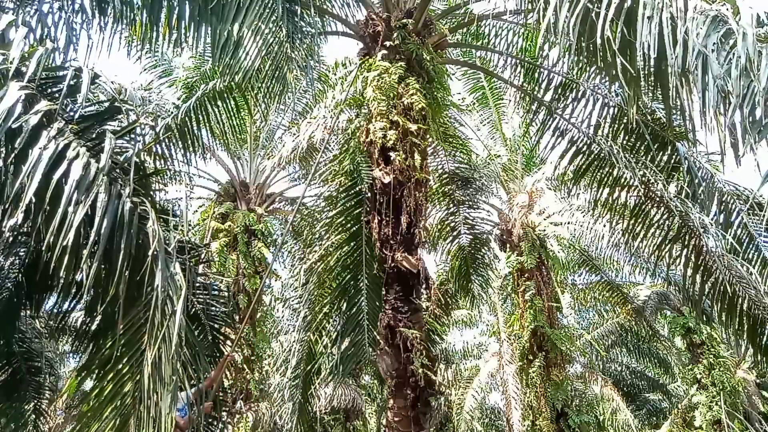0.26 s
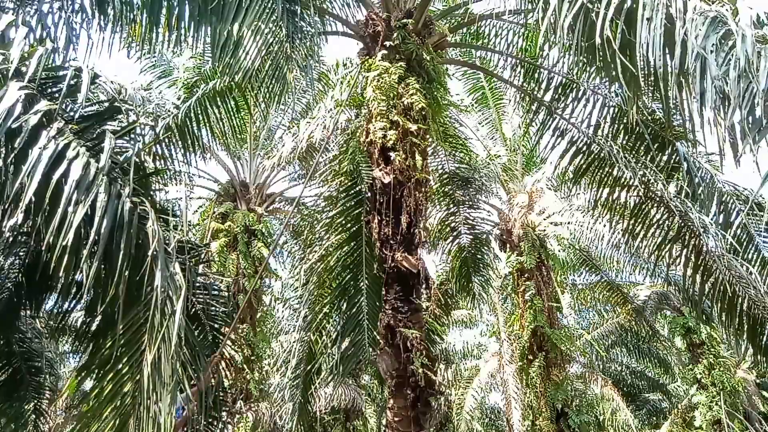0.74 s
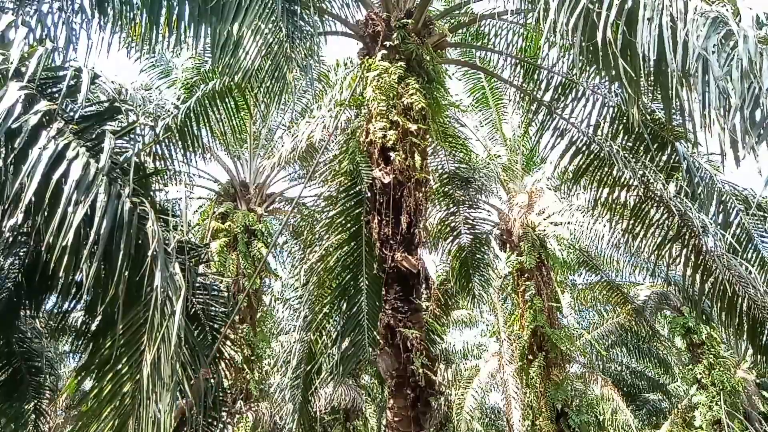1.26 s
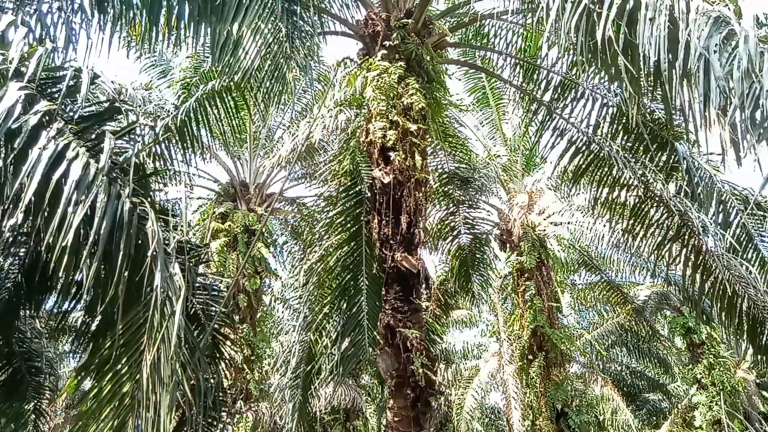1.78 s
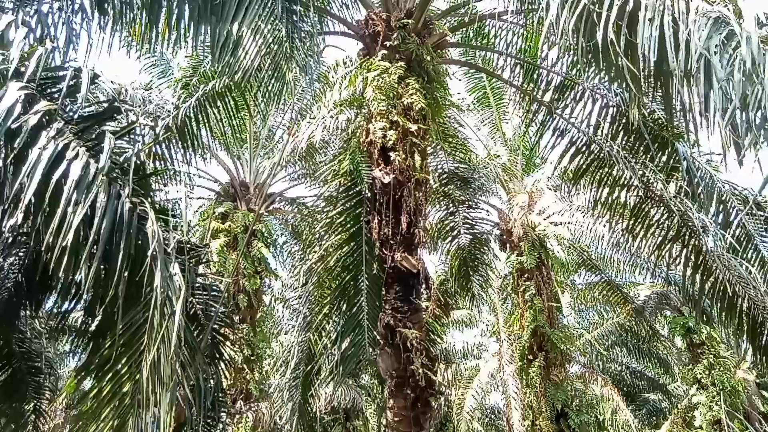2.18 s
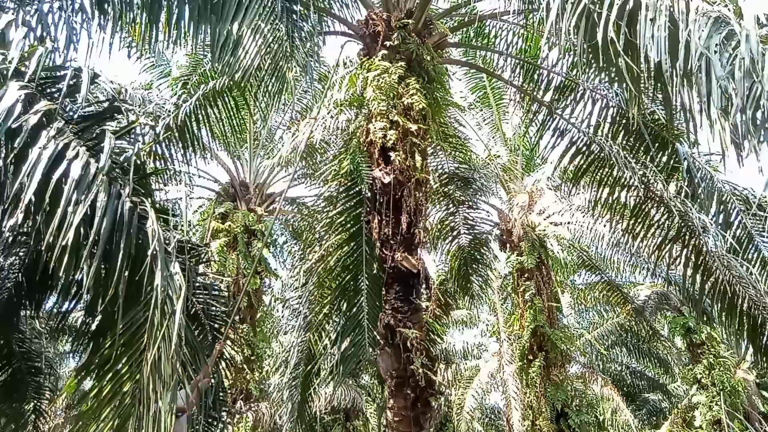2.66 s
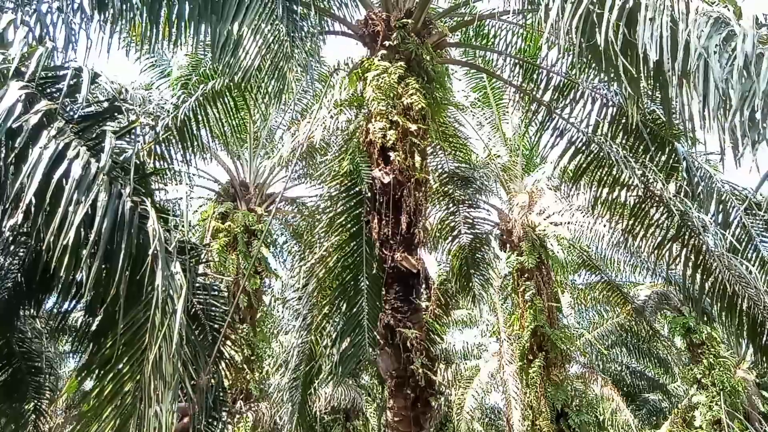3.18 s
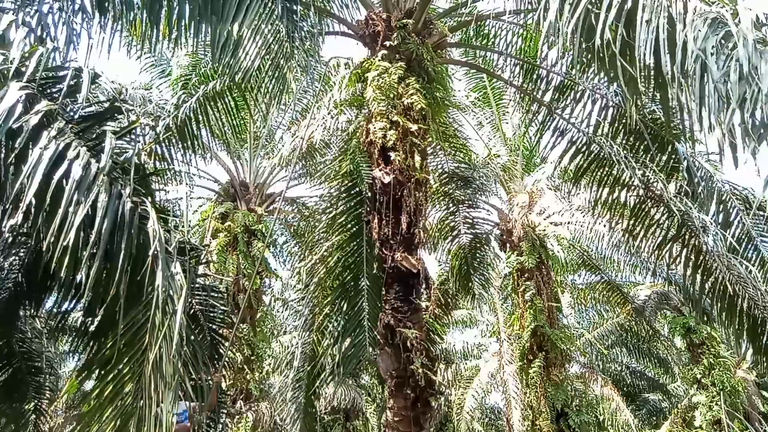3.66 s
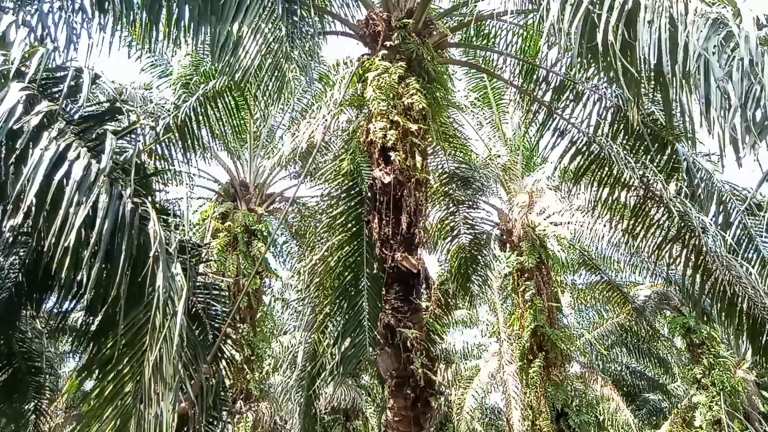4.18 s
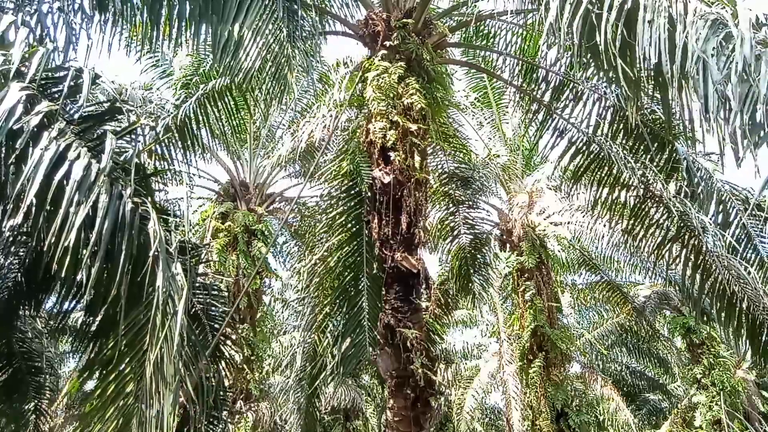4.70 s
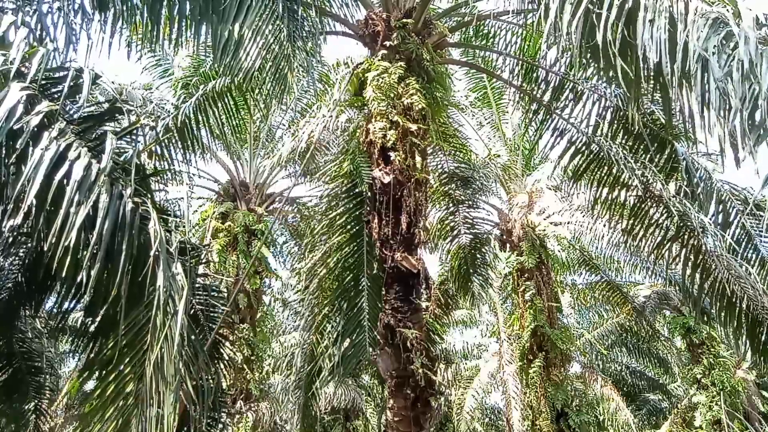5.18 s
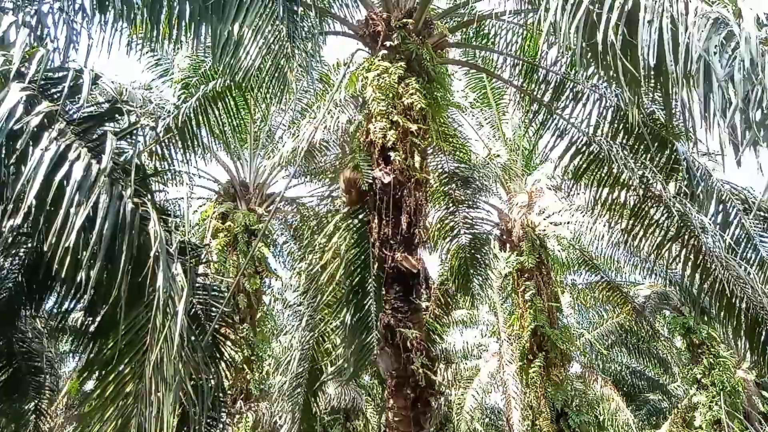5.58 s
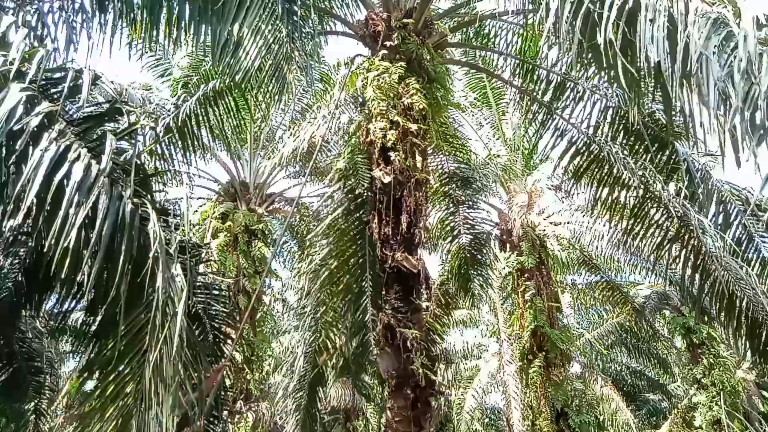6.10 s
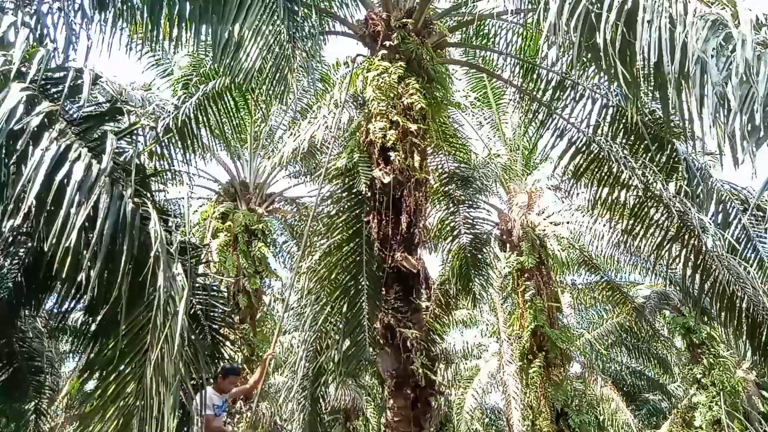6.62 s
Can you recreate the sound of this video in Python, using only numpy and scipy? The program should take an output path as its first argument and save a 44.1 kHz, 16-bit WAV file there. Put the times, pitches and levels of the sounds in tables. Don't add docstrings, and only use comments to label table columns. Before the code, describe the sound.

A harvester's sickle on a long metal pole works high in an oil palm. Light wooden taps and dry scrapes lead to a strong slice, a burst of knocks, leafy rustling and a near pause filled by thin insect drone and cricket. One loud cutting crack follows, then fronds snap and swish as the bunch falls, thumps the earth and bounces faintly. Outdoors, bright small microphone, little bass apart from the landing.

```python
import sys
import numpy as np
from scipy import signal
from scipy.io import wavfile
from scipy.ndimage import uniform_filter1d

SR = 44100
rng = np.random.default_rng(int(sys.argv[2]) if len(sys.argv) > 2 else 0)


def master_out(mix):
    frames = np.transpose(np.atleast_2d(mix))
    ceiling = np.clip(frames, -1, 1)
    pcm = np.round(ceiling * 32767).astype(np.int16)
    wavfile.write(sys.argv[1], SR, pcm)


def elevation(decibels):
    levels = np.asarray(decibels, float)
    return 10 ** (levels / 20)


N = 302085

# (frequency [Hz], width [Hz], level [dB])
STALK_MODES = [(480, 80, -12), (800, 220, -6), (1040, 160, 3), (1270, 110, 8.5), (1500, 300, 0)]
# (frequency [Hz], density [dB per Hz])
LEAF_SPECTRUM = [(1500, -35.5), (2100, -8.5), (3300, -1.5), (4190, -1.5), (5600, 4), (6720, 2.5),
                 (7500, -12.5), (8980, -23), (11500, -21), (13800, -16.5), (14800, -0.5), (15700, 1),
                 (16000, -30.5)]


def evened(x):
    return x / np.sqrt(np.mean(x ** 2) + 1e-20)


def add(mix, start_s, sound):
    part = mix[round(start_s * SR):][:len(sound)]
    part += sound[:len(part)]


def coloured(x, spectrum):
    hz, db = np.transpose(spectrum)
    bin_hz = abs(np.fft.fftfreq(4096, 1 / SR))
    log_gain = np.interp(np.log(bin_hz + 1), np.log(hz), db) * np.log(10) / 20
    taps = np.fft.ifft(np.exp(np.conj(signal.hilbert(log_gain)))).real[:2048]
    return evened(signal.oaconvolve(x, taps)[:len(x)])


def ringing(x, modes, order=1):
    out = 0
    for hz, width_hz, db in modes:
        r = np.exp(-np.pi * width_hz / SR)
        y = x
        for _ in range(order):
            y = signal.lfilter([1 - r, 0, r - 1], [1, -2 * r * np.cos(2 * np.pi * hz / SR), r * r], y)
        out = out + elevation(db) * y
    return evened(out)


def sliding(x, hz, width_hz):
    turn = np.exp(2j * np.pi * np.cumsum(hz) / SR)
    r = np.exp(-np.pi * width_hz / SR)
    return evened((turn * signal.lfilter([1], [1, -2 * r, r * r], x / turn)).real)


def wander(per_s):
    knot_rate_hz = 400
    knots = rng.standard_normal(int(N / SR * knot_rate_hz) + 2)
    knots = uniform_filter1d(knots, max(int(knot_rate_hz / per_s), 1))
    return np.interp(np.arange(N) * knot_rate_hz / SR, np.arange(len(knots)), evened(knots))


def crackle(per_s, spread_db, smooth):
    luck = rng.random(N)
    size = rng.exponential(1, N)
    hiss = rng.standard_normal(N)
    clicks = np.sign(hiss) * elevation(spread_db * np.minimum(size, 5)) * (luck < per_s / SR)
    return evened(clicks) + smooth * hiss


def patchy(x, patchy_db, bins, frames):
    z = signal.stft(x, nperseg=256, noverlap=192)[2]
    patches = rng.standard_normal(z.shape)
    for _ in range(2):
        patches = uniform_filter1d(uniform_filter1d(patches, bins, 0), frames, 1)
    return evened(signal.istft(z * elevation(patchy_db * evened(patches)), nperseg=256, noverlap=192)[1][:N])


def bursts(rows, attack_s):
    hiss, stalk, t = np.zeros(N), np.zeros(N), np.arange(SR) / SR
    for start_s, hold_s, db, stalk_db, t60_s in rows:
        after_s = np.maximum(t - attack_s - hold_s, 0)
        power = np.minimum(t / attack_s, 1) ** 4 * elevation(2 * (db - 60 * after_s / max(t60_s, .03)))
        add(hiss, start_s, power)
        add(stalk, start_s, power * elevation(2 * stalk_db))
    return np.array([hiss, stalk])


def insects():
    # (time [s], level [dB])
    chorus_level = [
        (0, -45),
        (2.3, -45),
        (3.1, -43.5),
        (6.85, -42.5),
    ]
    # (frequency [Hz], density [dB per Hz])
    main_spectrum = [(6000, -31), (6900, -15), (7450, 0), (8000, -7.5), (8700, -17), (9300, -35),
                     (11000, -30.5)]
    # (frequency [Hz], density [dB per Hz])
    overtone_spectrum = [(13500, -42), (14400, -30), (15100, 11), (15650, 15), (16000, -38)]
    # (start [s], length [s], level [dB], wing pitch [Hz])
    cricket_spells = [
        (0, .28, -57.5, 5800),
        (0.297, 0.56, -56.5, 5780),
        (.95, .3, -67, 5580),
        (1.26, 0.34, -60.5, 5780),
        (2.4, 0.33, -61.5, 5770),
        (2.72, 0.44, -52, 5800),
        (3.503, 0.26, -58.5, 5620),
        (3.85, 0.29, -52.5, 5800),
        (4.1, 0.36, -56, 5830),
        (4.62, .2, -60, 5600),
    ]
    overtone_db, overtone_growth = -3, 1
    spell_fade_s = 0.11
    wing_width_hz, second_wing_lower_hz, second_wing_db = 140, 294, -5

    t = np.arange(N) / SR
    band_db = np.interp(t, *np.transpose(chorus_level))
    high_db = band_db + overtone_db + overtone_growth * (band_db - band_db[0])
    buzz = crackle(13000, 3.1, 6.1) * elevation(0.95 * wander(30))
    cicadas = elevation(band_db) * coloured(buzz, main_spectrum) + elevation(high_db) * coloured(buzz, overtone_spectrum)

    start_s, length_s, db, pitch_hz = np.transpose(cricket_spells)[:, :, None]
    to_edge_s = np.minimum(t - start_s + spell_fade_s, start_s + length_s - t)
    spells = (elevation(db) * np.clip(to_edge_s / spell_fade_s, 0, 1)).sum(0)
    hz = np.interp(t, (start_s + length_s / 2).ravel(), pitch_hz.ravel()) + 45 * wander(9)
    throb_hz = 6.7 + 0.82 * wander(3)
    throb = np.clip(0.76 + 0.3 * np.sin(2 * np.pi * np.cumsum(throb_hz) / SR), 0, 1)
    stroke_hz = 95 + 6 * wander(19)
    wing_strokes = 1 + 0.5 * np.sin(2 * np.pi * np.cumsum(stroke_hz) / SR)
    rasp = rng.standard_normal(N) * wing_strokes * throb * elevation(1.8 * wander(14))
    first_wing = sliding(rasp, hz, wing_width_hz)
    second_wing = sliding(rasp, hz - second_wing_lower_hz, wing_width_hz)
    return cicadas + spells * (first_wing + elevation(second_wing_db) * second_wing)


def air():
    # (frequency [Hz], density [dB per Hz])
    wash_spectrum = [(18, -58), (30, -19.5), (98, -5.5), (512, -21), (1320, -14), (2060, -27.5),
                     (3200, -21.5), (4200, -42), (5300, -33), (6300, -19), (10200, -29), (11100, -39),
                     (16000, -52)]
    wash_db = -58.5
    noise = rng.standard_normal(N)
    gusts = signal.lfilter([.03], [1, -.97], noise) * (elevation(2.5 * wander(6)) - 1)
    wash = coloured((noise + gusts) * elevation(0.2 * wander(15)), wash_spectrum)
    return elevation(wash_db) * patchy(wash, 1.9, bins=2, frames=60)


def fronds():
    # (start [s], hold [s], hiss [dB], stalk above hiss [dB], release t60 [s])
    blade_strokes = [(.398, 0.0064, -45, -2, 0.25), (.565, 0.019, -36.5, 0.5, 0.055),
                     (.61, 0.027, -53, 7.5, 0.18), (.772, 0.027, -41.5, -1.5, 0.24),
                     (.797, 0.033, -38, 6, 0.051), (.85, 0.034, -56.5, 9.5, 0.21),
                     (.962, 0.0094, -53.5, 7.5, 0.12), (1.045, 0.01, -63, 15.5, 0.058),
                     (1.112, 0.02, -52, 7, 0.18), (1.558, .01, -35.5, -7, .1),
                     (1.575, 0.067, -22.5, -0.5, 0.51), (1.83, 0.015, -37.5, 2, 0.067),
                     (1.895, 0.03, -34.5, -4, 0.35), (2.668, 0.0071, -50, 6, 0.074),
                     (2.72, 0.033, -41.5, 2, 0.33), (2.805, 0.022, -41, 1.5, 0.27),
                     (2.945, .03, -45, 5, 0.25), (4.693, 0.012, -33, -7, 0.14),
                     (4.74, 0.02, -40, -1.5, 0.32), (4.992, 0.0076, -24.5, -3, 0.084),
                     (5.006, 0.064, -17, 0.5, 0.061), (5.06, 0.004, -13.5, -5, 0.041)]
    # (start [s], hold [s], hiss [dB], ribs above hiss [dB], release t60 [s])
    rustles = [(1.245, 0.055, -67, -23, 0.49), (1.63, 0.069, -20, -4.5, 0.43),
               (2.86, 0.011, -36.5, -20, 0.17), (2.96, 0.1, -30, -2.5, 0.79), (3.1, 0.22, -35, -9, 0.64),
               (3.185, 0.047, -34.5, -1.5, 0.38), (3.315, 0.019, -53.5, 15, 0.11),
               (3.4, 0.23, -50, -20, 1.4), (3.735, 0.0064, -42, -16.5, 0.38), (3.85, 0.18, -53.5, -9, 0.3),
               (4.135, 0.023, -33, -21, 0.37), (4.28, 0.019, -49.5, -7, 1.5), (4.625, 0.013, -48, -17, .15),
               (4.915, 0.0087, -52, 0, 0.12), (4.94, 0.016, -45, -18, 0.15),
               (5.085, 0.027, -23.5, -4, 0.14), (5.14, 0.22, -33, -8.5, 0.59), (4.19, 0.013, -62, 14, 0.22),
               (3.58, 0.15, -65, 0, 0.28)]
    # (start [s], hold [s], hiss [dB], ribs above hiss [dB], release t60 [s])
    bunch_fall = [(5.316, 0.12, -26, -11.5, 0.98), (5.456, 0.11, -22.5, -10.5, 0.2),
                  (5.534, .13, -20, -6, 0.26), (5.7, 0.075, -23, -11.5, 0.22),
                  (5.791, 0.19, -19.5, -9.5, 0.22), (6.03, 0.089, -30.5, -10.5, 0.3),
                  (6.123, 0.0086, -14.5, -11.5, 0.36), (6.25, 0.1, -36.5, -18, 0.46),
                  (6.3, 0.019, -37.5, -5, 0.18), (6.38, 0.14, -40.5, -13.5, 0.75),
                  (6.6, 0.097, -38, -19.5, 0.51), (6.72, .15, -40.5, -21.5, 0.56),
                  (6.485, .02, -36, -12, .2), (6.508, 0.025, -27.5, -13, 0.34)]
    # (start [s], hold [s], level [dB], release t60 [s])
    frond_swings = [(0.577, 0.015, -55, 0.17), (0.804, 0.037, -50.5, 0.11), (1.123, 0.029, -51, 0.12),
                    (1.569, 0.067, -41, .2), (1.62, 0.095, -34, 0.18), (3.014, 0.12, -46, 0.58),
                    (3.189, 0.07, -41, 0.22), (3.491, 0.13, -65, 0.36), (3.753, 0.05, -56, 0.55),
                    (4.123, 0.092, -64, .5), (4.498, 0.14, -60.5, .4), (4.703, 0.053, -55.5, 0.2),
                    (5.043, 0.035, -31.5, 0.15), (5.11, .03, -43, 0.15), (5.317, 0.11, -48, .4),
                    (5.507, 0.21, -38.5, 0.46), (5.803, 0.16, -35.5, 0.24), (6.04, 0.049, -43, 0.27),
                    (6.167, 0.018, -46, 0.56), (6.481, 0.026, -40, 0.35)]
    # (frequency [Hz], width [Hz], level [dB])
    blade_modes = [(1857, 156, -2), (2320, 44, 5), (3188, 480, -5), (3484, 770, -3.5), (4910, 310, -1),
                   (5340, 740, 0), (5800, 195, 5), (6634, 99, 9.5), (7260, 180, 4.5), (15400, 750, 1.5)]
    # (frequency [Hz], density [dB per Hz])
    rib_spectrum = [(400, -21.5), (540, -15.5), (720, -3), (1150, 1), (1430, 0.5), (1750, -1), (2200, -12),
                    (3000, -32)]
    # (frequency [Hz], density [dB per Hz])
    tip_spectrum = [(1500, -23.5), (4200, -11), (5500, 1), (7000, -3), (9000, -21), (11500, -20.5),
                    (13800, -18), (15200, 1.5), (16000, -20)]
    # (frequency [Hz], density [dB per Hz])
    sway_spectrum = [(40, -52), (90, -8.5), (160, 0.5), (250, 0), (400, -5), (540, -8.5), (900, -26.5)]
    stroke_attack_s, rustle_attack_s, sway_attack_s = 0.014, 0.018, 0.026
    drag_loose, drag_stroke = 0.1, 0.68
    breeze_db = -74
    faint_below_db, faint_span_db = -34, 8.5

    strokes = bursts(blade_strokes, stroke_attack_s)
    power = strokes + bursts(rustles + bunch_fall, rustle_attack_s) + 1e-12
    drag = drag_loose + (drag_stroke - drag_loose) * strokes[0] / power[0]

    drive = crackle(5000, 3.3, 0.8) * elevation(1.2 * wander(60))
    recent_db = 10 * np.log10(uniform_filter1d(power[0], size=2000))
    tips = np.clip((faint_below_db - recent_db) / faint_span_db, 0, 1)
    leaves = tips * coloured(drive, tip_spectrum) + (1 - tips) * coloured(drive, LEAF_SPECTRUM)
    leaves = patchy(leaves, 2.2, bins=2, frames=20)
    blade = patchy(ringing(drive, blade_modes, order=2), 2.5, bins=2, frames=40)
    hiss = np.sqrt(1 - drag) * leaves + np.sqrt(drag) * blade

    slips = (0.6 * drive + crackle(900, 3.5, 0.6)) * elevation(1.2 * wander(40))
    stalk = drag * ringing(slips, STALK_MODES, order=2) + (1 - drag) * coloured(slips, rib_spectrum)
    stalk = patchy(stalk, 1.4, bins=1, frames=25)

    swing_rows = [(start_s, hold_s, db, 0, t60_s) for start_s, hold_s, db, t60_s in frond_swings]
    swaying = np.sqrt(bursts(swing_rows, sway_attack_s)[0] + elevation(2 * breeze_db))
    sway = coloured(rng.standard_normal(N) * elevation(2.0 * wander(25)), sway_spectrum)
    return np.sqrt(power[0]) * hiss + np.sqrt(power[1]) * stalk + swaying * sway


def snaps():
    # (time [s], knock peak [dB], knock pitch [Hz], crack above knock
    # [dB])
    taps = [(.415, -28, 1070, -23), (.46, -38, 1170, -9), (.578, -24, 1030, -19), (.649, -42, 1310, -8),
            (.808, -19, 1200, -22), (.848, -37, 1220, -18), (.977, -31.5, 950, -12),
            (1.056, -40, 1360, -18), (1.124, -27.5, 1370, -20), (1.149, -30.5, 930, -11),
            (1.511, -37.5, 1300, -19), (1.593, -14, 1250, -10), (1.651, -4, 1057, -8),
            (1.733, -12.5, 1180, -9), (1.837, -21, 1140, -14), (1.908, -24, 1190, -34),
            (2.678, -10, 858, -20), (2.742, -20, 1130, -11), (2.82, -19.5, 1300, -19),
            (2.984, -1.5, 1030, -37), (3.02, -9, 757, -3), (3.034, -7, 900, -15), (3.047, -18, 1420, -16),
            (3.071, -12, 1010, -26), (3.202, -20, 1250, -21), (3.345, -19, 780, -20),
            (4.759, -23, 1200, -5), (5.084, -10, 1080, -2), (6.14, -11, 1300, 8), (6.52, -22.5, 715, -12),
            (6.518, -24, 345, -20), (6.527, -22, 1120, -15), (2.845, -24, 870, -20), (2.961, -22, 990, -20),
            (3.125, -22, 900, -20), (3.225, -15.5, 824, -20), (1.574, -17, 1290, -8)]
    # (time [s], crack peak [dB], knock below crack [dB])
    rib_cracks = [(1.639, -9, -2), (1.653, -8.5, 15), (1.596, -17, 12), (1.926, -19.5, -6.5),
                  (2.723, -24, 12), (3.746, -40, 10), (4.151, -26, 25), (4.174, -30, 20), (2.876, -25, 19),
                  (4.598, -41, 6), (4.64, -35, 16), (4.712, -14, 4), (5.075, -0.5, 2), (5.13, -27, 6),
                  (5.328, -28, 14), (5.471, -20, 12), (5.495, -16, 8), (5.555, -12, 2), (5.737, -17, 12),
                  (5.772, -17, 10), (5.863, -16, 12), (5.887, -21, 4), (6.517, -30.5, 12), (5.546, -20, 1),
                  (5.674, -6, 1.5), (5.689, 1, 8), (5.717, -13, 10), (5.806, -5.5, 23), (5.827, -7, 24),
                  (5.844, -9.5, 6), (6.058, -9, 28), (6.483, -25, 21)]
    knock_t60_s, knock_rise_s, snap_t60_s = 0.014, 0.0025, 0.021
    second_ratio, second_db = 1.31, -11.5
    rib_hz, crack_hz, pitch_spread = 1250, 5800, 0.056
    bright_db, dull_hz = -10, 8600

    out, t = np.zeros(N), np.arange(4000) / SR
    rows = taps + [(s, db - below_db, rib_hz, below_db) for s, db, below_db in rib_cracks]
    noises = rng.standard_normal((len(rows), len(t)))
    fade = elevation(-60 * t / snap_t60_s)
    knock_shape = elevation(-60 * t / knock_t60_s) * (1 - np.exp(-t / knock_rise_s))
    body_shape = fade * (1 - np.exp(-t / 0.0031))
    crack_shape = fade * (1 - np.exp(-t * 2000))
    for (time_s, db, hz, crack_db), noise in zip(rows, noises):
        modes = np.sin(2 * np.pi * hz * t) + elevation(second_db) * np.sin(2 * np.pi * second_ratio * hz * t)
        knock = 1.93 * knock_shape * modes + 0.11 * body_shape * ringing(noise, STALK_MODES)
        own_hz = crack_hz * (1 + pitch_spread * noise[-1])
        crack = 0.61 * coloured(noise, LEAF_SPECTRUM) + 0.1 * ringing(noise, [(own_hz, 350, 0)])
        low = signal.lfilter(*signal.butter(4, dull_hz, "low", fs=SR), crack)
        top = signal.lfilter(*signal.butter(4, dull_hz, "high", fs=SR), crack)
        crack = low + elevation(min(db + crack_db - bright_db, 0)) * top
        add(out, time_s, elevation(db) * (knock + elevation(crack_db) * crack_shape * crack))
    return out


def pings():
    # (time [s], peak [dB], pitch [Hz], t60 [s])
    single_rings = [(1.251, -45, 3160, 0.064), (1.275, -43, 3200, 0.041), (1.925, -16, 3150, 0.033),
                    (2.816, -9, 5850, 0.025), (2.819, -23.5, 5810, 0.075), (4.358, -41, 3710, 0.063),
                    (.978, -46, 4720, 0.042), (1.125, -43, 4900, 0.055), (2.677, -35.5, 2720, 0.032),
                    (3.33, -28.5, 4210, 0.053), (4.295, -43, 1555, 0.081), (4.637, -41, 3000, 0.035),
                    (4.71, -13, 2270, 0.014), (4.758, -28, 2330, 0.04), (6.483, -25, 3100, 0.028),
                    (6.577, -30, 1630, 0.037), (6.1425, 1.5, 351, 0.042), (5.4, -21, 750, 0.035),
                    (4.705, -32, 1250, 0.13), (4.707, -23.5, 800, 0.046), (5.0745, -7.5, 6650, 0.027),
                    (5.0835, 8.5, 6560, .014), (4.152, -38, 3800, 0.076), (4.182, -48, 1050, 0.1),
                    (4.355, -51, 1750, 0.1), (1.82, -41, 3150, .08), (.58, -34, 2050, 0.057),
                    (.6, -43, 1760, 0.12), (1.928, -25.5, 1900, 0.058), (2.724, -33, 4640, .05),
                    (2.724, -42, 2300, 0.04)]
    roughness, rise_s = 0.4, 0.0079
    out, t = np.zeros(N), np.arange(9000) / SR
    noises = rng.standard_normal((len(single_rings), len(t)))
    for (time_s, db, hz, t60_s), noise in zip(single_rings, noises):
        tone = np.sin(2 * np.pi * hz * t) + roughness * ringing(noise, [(hz, 160, 0)])
        add(out, time_s, elevation(db + 5.0 - 60 * t / t60_s) * (1 - np.exp(-t / rise_s)) * tone)
    return out


def thuds():
    # (time [s], peak [dB], t60 [s], lowest pitch set going [Hz])
    low_blows = [
        (2.687, -30.5, 0.17, 251),
        (4.152, -34.5, 0.2, 330),
        (6.136, -22, 0.038, 244),
        (6.141, -15.5, 0.079, 100),
        (6.149, -5, 0.055, 44.7),
        (6.216, -24, 0.032, 60),
        (6.496, -36, 0.046, 300),
        (6.515, -26.5, 0.076, 200),
        (6.529, -27, 0.096, 120),
    ]
    # (frequency [Hz], width [Hz], level [dB])
    ground_modes = [(47, 20, -2), (58, 53, 3), (71, 32, 11), (137, 65, 6.5), (190, 50, -4), (305, 56, -1),
                    (405, 20, -29)]
    out, t = np.zeros(N), np.arange(9000) / SR
    for time_s, db, t60_s, low_hz in low_blows:
        drive = 0.97 * rng.standard_normal(len(t)) * elevation(-60 * t / t60_s)
        add(drive, 0, signal.windows.hann(len(t) // 200, False))
        boom = ringing(drive, ground_modes)
        boom = signal.lfilter(*signal.butter(3, low_hz, "high", fs=SR), boom) * elevation(-20 * t / t60_s)
        add(out, time_s, elevation(db) * boom / abs(boom).max())
    return out


def grove(x, t60_s=0.12):
    taps = np.zeros(SR // 2)
    at = np.arange(300, len(taps) - 20, 20)
    taps[at + rng.integers(0, 20, len(at))] = rng.choice([-1., 1.], len(at))
    taps *= elevation(-60 * np.arange(len(taps)) / SR / t60_s)
    return signal.oaconvolve(x, taps / np.linalg.norm(taps))[:N]


def scene():
    background = insects() + air()
    leaves = fronds()
    hits = snaps() + pings() + thuds()
    scatter = grove(elevation(-10.5) * hits + elevation(-12.0) * leaves)
    return (hits + leaves + scatter + background)[None]


def band_limit(x):
    return signal.sosfilt(signal.butter(12, 16050, fs=SR, output="sos"), x)


def record(dry):
    # (frequency [Hz], depth [dB per bin])
    gate_depth = [(1500, 102), (2100, 91), (4300, 91), (5000, 104), (8600, 104), (9400, 93), (10300, 89.5),
                  (10800, 80), (13500, 76.5), (14500, 79)]
    edge_hz, gate_low_hz, gate_high_hz = 15850, 1500, 14500
    hz, _, z = signal.stft(dry, SR, nperseg=1024, noverlap=768)
    band = (hz > gate_low_hz) & (hz < gate_high_hz)
    gate_db = np.interp(hz[band], *np.transpose(gate_depth))[:, None]
    power = uniform_filter1d(abs(z[:, band]) ** 2, size=7, axis=1, mode="nearest")
    power = uniform_filter1d(power, size=3, axis=2)
    z[:, band] /= 1 + elevation(-6 * (10 * np.log10(power + 1e-20) + gate_db))
    kept = signal.istft(z * (hz < edge_hz)[:, None], SR, nperseg=1024, noverlap=768)[1][:, :N]
    return band_limit(np.clip(kept, -1, 1))


dry = scene()
out = record(dry)
master_out(out)
```